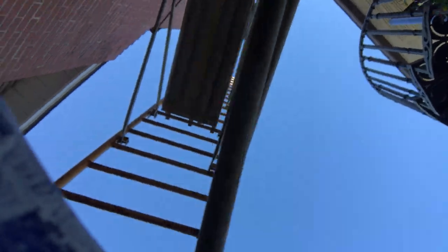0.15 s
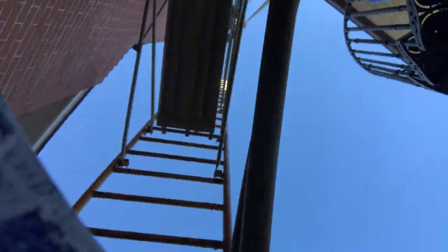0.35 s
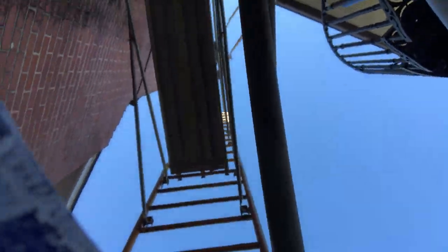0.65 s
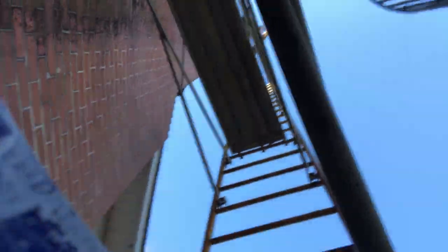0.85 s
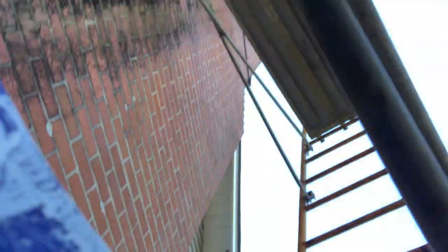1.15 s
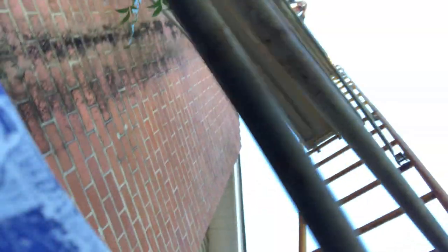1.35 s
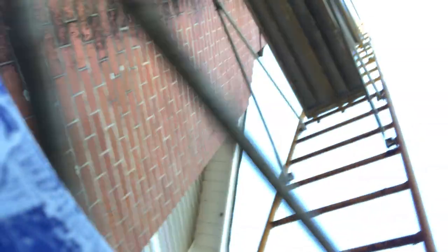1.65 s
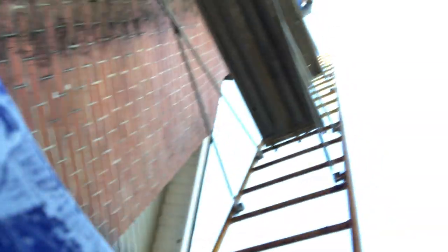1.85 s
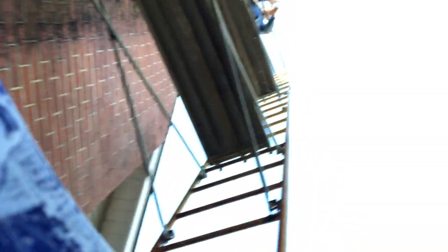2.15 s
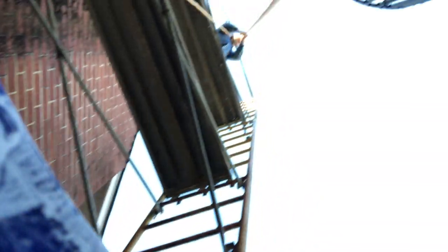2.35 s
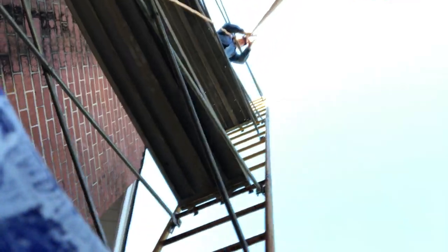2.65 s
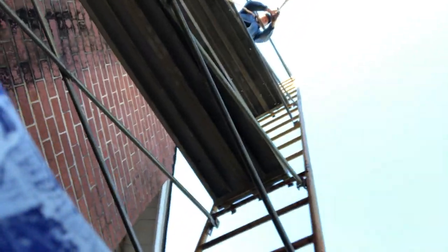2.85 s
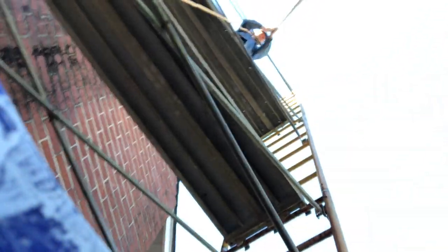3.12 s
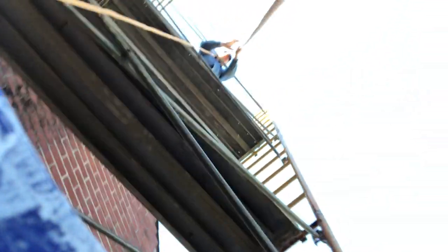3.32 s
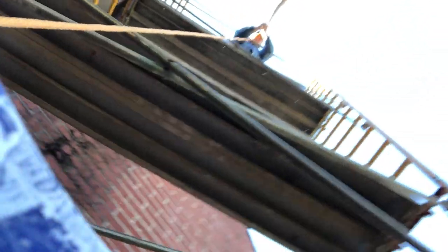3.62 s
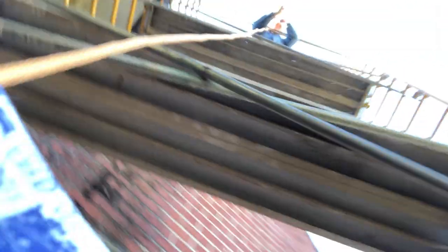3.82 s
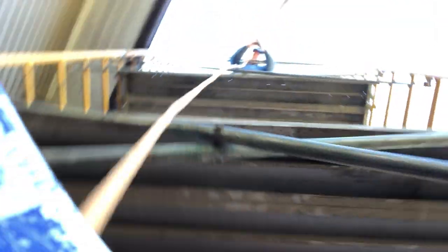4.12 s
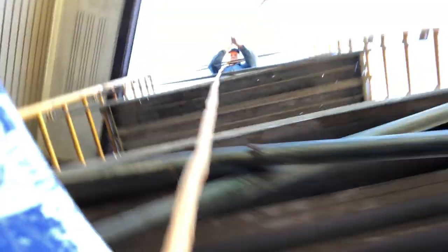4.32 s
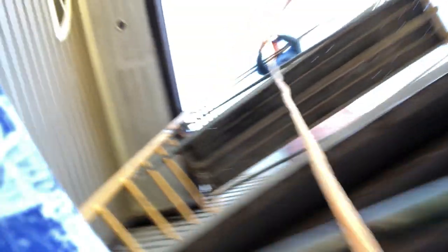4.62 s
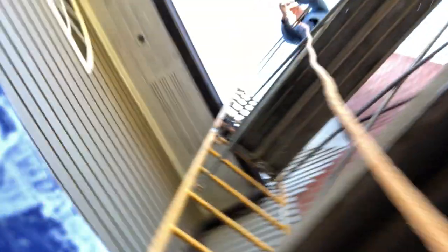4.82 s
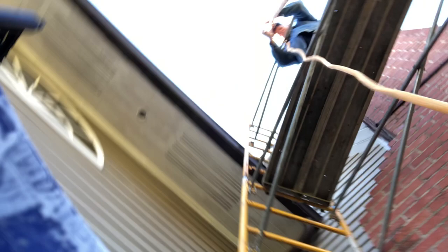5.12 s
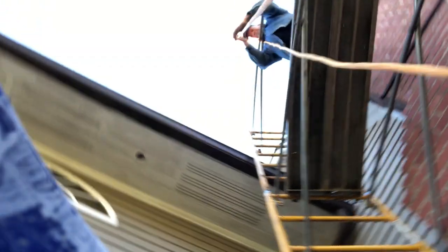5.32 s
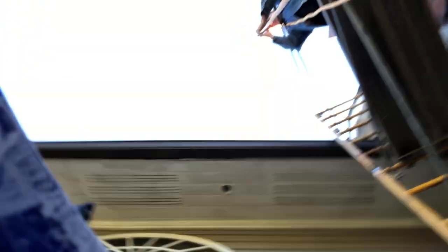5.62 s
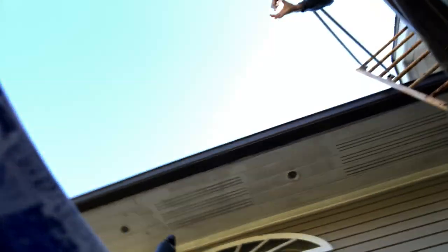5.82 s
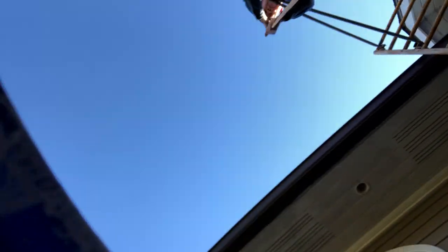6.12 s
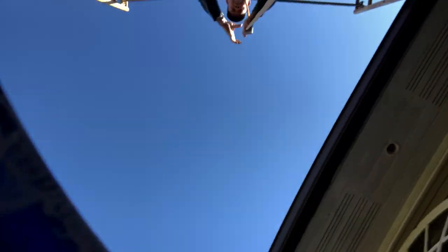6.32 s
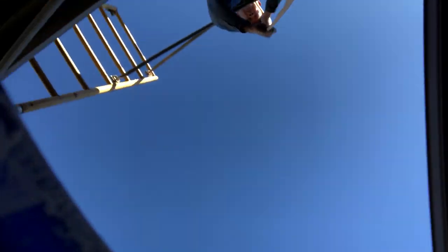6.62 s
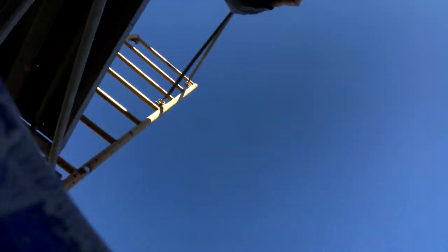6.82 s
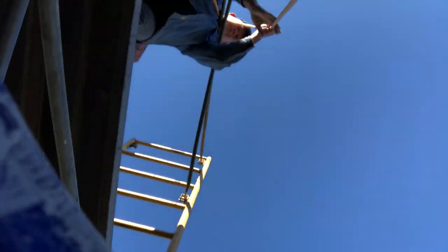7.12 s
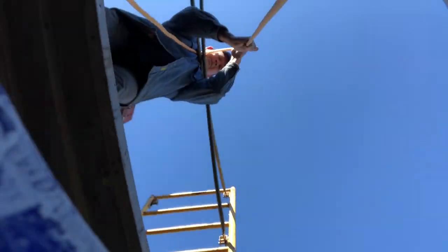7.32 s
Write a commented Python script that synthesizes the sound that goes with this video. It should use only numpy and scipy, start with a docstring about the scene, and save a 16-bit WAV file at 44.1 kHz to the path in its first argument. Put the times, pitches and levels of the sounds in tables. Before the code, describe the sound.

A plastic bucket of tools rises beside a scaffold, the microphone among the load. Short dull-metallic clacks and gritty scuffs run throughout, with a busy clatter at one second, one heavy hollow bump soon after, light ticks, then denser knocking past the middle. Soft wind thuds and a distant outdoor hum lie beneath; late on, a tool slides with a small throbbing squeak before last clacks.

```python
"""A plastic bucket of hand tools is hauled up a scaffold on a rope, the microphone inside it.
A town murmur, a faint hum and low wind buffeting run throughout, made of shaped noise and a sine.
Friction noise scuffs and ringing tools clack all along; early on a bird chirps twice in falling sines.
From 0.3 s the bucket bumps the frame with struck resonances, from 0.9 s dying noise adds bright slaps.
Near the end one tool slides with a throbbing whistle of noise through resonances."""
import sys
import numpy as np
from scipy import signal
from scipy.fft import rfft, irfft, next_fast_len
from scipy.io import wavfile

SR = 44100
rng = np.random.default_rng(int(sys.argv[2]) if len(sys.argv) > 2 else 0)


def to_wav(s):
    """Save 16-bit WAV."""
    ch = np.atleast_2d(s).T  # columns
    pcm = np.round(np.clip(ch, -1, 1) * 32767)  # PCM
    wavfile.write(sys.argv[1], SR, pcm.astype(np.int16))


N = 328986

# resonances of the tools, the last six broad and dry: pitch_hz, level_db, t60_s (time to fall by 60 dB)
TOOL_MODES = [(541.7, -0.5, 0.13), (592, 4, 0.056), (976, 5.5, 0.048), (1178.4, 3.5, 0.073),
              (1269, -1, 0.072), (1672.5, 1.5, 0.039), (2036, -1.5, 0.007), (2189.6, 9.5, 0.01),
              (2292, -19, 0.084), (2913, -6, 0.044), (3350, -12.5, 0.037), (3656, 4.5, 0.0078),
              (4680, -11, 0.019), (7400, -10.5, 0.026), (781, 4, 0.015), (1801, 1.5, 0.023),
              (3250, -2, 0.0062), (5810, 7.5, 0.00088), (8620, 11.5, 0.00074), (12900, 0, 0.0028)]
# level of the steady rubbing of the load: time_s, level_db
RUBBING = [(0, -67), (.6, -67), (1.0, -59.5), (1.45, -66), (1.9, -62), (2.4, -56.5), (2.8, -69),
           (3.3, -52.5), (3.9, -64), (4.5, -58), (5.2, -56.5), (5.7, -64.5), (6.4, -59), (6.9, -59),
           (7.46, -59)]
# single scuffs: middle_s, half_length_s, rub_db, swish_db, sizzle_db
STROKES = [(.285, 0.042, -58.5, -69, -68), (.55, 0.0091, -84, -68, -80), (.89, 0.038, -57, -61.5, -82),
           (1.052, 0.014, -37.5, -40, -80), (1.14, 0.057, -56, -62, -80), (1.22, 0.026, -40, -47, -69),
           (1.29, 0.054, -46, -60, -80), (1.7, 0.057, -46.5, -88, -84), (1.87, 0.062, -54.5, -74, -92),
           (2.045, 0.045, -63, -61.5, -57), (2.23, 0.016, -69.5, -65, -80), (2.47, 0.022, -65, -64.5, -62),
           (3.35, 0.027, -55, -71, -75), (3.52, 0.072, -56, -69, -82), (4.07, .02, -90, -90, -63),
           (4.42, 0.023, -42.5, -64, -80), (6.27, 0.024, -55.5, -79, -85), (6.78, 0.017, -47, -60, -72),
           (6.87, 0.045, -49.5, -85, -85), (7.02, 0.016, -58, -64, -90)]


def amp(db):
    """Gain of a dB value."""
    return 10 ** (np.asarray(db) / 20)


def rms_one(x):
    """Scale to rms 1."""
    return x / np.sqrt(np.mean(x ** 2) + 1e-20)


def in_time(rows):
    """Columns of a curve table, joined by straight lines, at every sample."""
    s, *columns = np.transpose(rows)
    return [np.interp(np.arange(N) / SR, s, c) for c in columns]


def drift(rate_hz):
    """Random wandering of rms 1: noise smoothed to keep what is slower than about rate_hz."""
    step = 40   # computed only at every 40th sample, then joined by lines
    r = np.exp(-2 * np.pi * rate_hz * step / SR)
    noise = rng.standard_normal(N // step + 2002)
    slow = signal.lfilter([1], [1, -2 * r, r * r], noise)[2000:]   # skip the filter's start
    return np.interp(np.arange(N) / step, np.arange(len(slow)), rms_one(slow))


def colour(x, spectrum):
    """Shape a signal to a spectrum in dB per Hz, power kept for white input."""
    hz, level_db = np.transpose(spectrum)
    size = next_fast_len(N)
    bins_hz = np.maximum(np.arange(size // 2 + 1) * SR / size, 1)
    gain = amp(np.interp(np.log(bins_hz), np.log(hz), level_db, left=-90, right=-90))
    return irfft(rfft(x, size) * rms_one(gain), size)[:N]


def swells(rows):
    """Sums of bell-shaped swells, one gain curve for each dB column."""
    out = np.zeros((len(rows[0]) - 2, N))
    for middle_s, half_s, *level_db in rows:
        first = max(round((middle_s - 3 * half_s) * SR), 0)
        last = min(round((middle_s + 3 * half_s) * SR), N)
        near = np.arange(first, last)
        bell = np.exp(-((near / SR - middle_s) / half_s) ** 2)
        out[:, near] += amp(level_db)[:, None] * bell
    return out


def ring(x, hz, t60_s):
    """A resonance: a unit click sets a dying sine of starting height 1 ringing."""
    r, w = amp(-60 / (t60_s * SR)), 2 * np.pi * hz / SR
    return signal.lfilter([0, np.sin(w)], [1, -2 * r * np.cos(w), r * r], x + 1e-18)


def struck(blows, modes, tilt_hz, spread_db, sparse, swell_cycles):
    """Each blow is a short dying chatter of contacts; it drives every mode with a strength of its own.

    A blow lists its start in s, a level in dB at each tilt_hz, and the fading time of its chatter in s."""
    size = 2048   # samples of chatter
    t = np.arange(size) / SR
    hz = np.array(modes)[:, 0]
    drive = np.zeros((len(modes), N + size))
    softer = np.exp(-np.outer(hz, t) / 60.0)   # later contacts are softer and lose the treble
    luck = rng.standard_normal((len(blows), len(modes) + 2 * size))
    for (start_s, *tilt_db, length_s), row in zip(blows, luck):
        mode_luck, size_luck, push = np.split(row, [len(modes), len(modes) + size])
        contacts = push * amp(sparse * size_luck)
        contacts[0] = np.max(np.abs(contacts[:60]))   # the first touch is firm
        contacts *= np.exp(-t / np.clip(length_s, .0003, .015))
        contacts /= np.sqrt(np.sum(contacts ** 2))
        # what the chatter holds at each mode
        reach = np.abs(rfft(contacts))[np.round(hz * size / SR).astype(int)]
        mode_db = np.interp(np.log(hz), np.log(tilt_hz), tilt_db)
        strength = amp(mode_db + spread_db * mode_luck)
        strength /= np.sqrt(reach ** 2 + 0.092)   # evens out the share each mode gets of the blow
        at = round(start_s * SR)
        drive[:, at:at + size] += strength[:, None] * contacts * softer
    out = np.zeros(N)
    for d, (f, db, t60_s) in zip(drive, modes):
        # a mode takes some cycles to swell, so the lows come late: a wide resonance of gain 1 goes first
        unit_gain = 2 * np.log(1000) * f / (swell_cycles * SR)
        swell = unit_gain * ring(d[:N], f, swell_cycles / f)
        out += amp(db) * ring(swell, f, t60_s)
    return out


def town():
    """A far murmur of shaped steady noise, and a hum: a sine wavering in pitch and level."""
    # spectrum of the murmur: pitch_hz, level_db (per Hz, relative)
    murmur_spectrum = [(15, -63), (25, 5.5), (76, 13.5), (149, -9.5), (301, -6.5), (531, -7), (1070, -5.5),
                       (1190, -9.5), (1520, -16), (2220, -15), (2610, -19), (14800, -28.5), (16000, -28)]
    # level of the hum: time_s, level_db
    hum_level = [(0, -61.5), (3, -62.5), (4, -65.5), (7.46, -62)]
    murmur = amp(-59.5) * colour(rng.standard_normal(N), murmur_spectrum)
    hum_hz = 149 + 1.35 * drift(4.2)
    phase = 2 * np.pi * np.cumsum(hum_hz) / SR
    hum = amp(in_time(hum_level)[0] + 0.62 * drift(4)) * np.sin(phase)
    return murmur + hum


def wind():
    """Low buffeting at the microphone: deep noise with a wandering level, swelling in gusts."""
    # steady level: time_s, level_db
    wind_level = [(0, -59), (.8, -59.5), (1.4, -67.5), (2.2, -61.5), (3.0, -56), (3.7, -55.5), (4.4, -57),
                  (5.1, -57), (5.6, -57.5), (6.1, -48), (6.7, -58.5), (7.46, -53)]
    # spectrum: pitch_hz, level_db (per Hz, relative)
    buffet_spectrum = [(12, -39), (20, -50), (53, 6.5), (92, 6.5), (170, -3), (343, -15), (398, -17.5),
                       (449, -61), (500, -38), (650, -62), (1100, -120)]
    # added swells: middle_s, half_length_s, level_db
    gusts = [(1.125, 0.011, -34), (1.22, 0.036, -34.5), (3.26, 0.055, -45), (4.42, 0.096, -44.5),
             (4.755, 0.011, -30.5), (4.86, 0.05, -46.5), (5.01, 0.032, -37.5), (5.76, 0.0077, -31),
             (5.865, 0.01, -43.5), (5.98, 0.038, -44), (6.08, 0.035, -41), (6.36, 0.014, -47.5),
             (6.46, 0.045, -43.5), (6.85, 0.062, -43), (7.05, 0.078, -55), (7.33, 0.031, -50.5)]
    gain = amp(in_time(wind_level)[0] + 0.49 * drift(9.0)) + swells(gusts)[0]
    return gain * colour(rng.standard_normal(N), buffet_spectrum)


def scuff():
    """Uneven grains of friction: part rings the tools, part is a broad rub and a bright swish."""
    # spectra of the two: pitch_hz, level_db (per Hz, relative)
    rub_spectrum = [(88, -68), (150, -7), (192, 1), (444, -2.5), (596, -2.5), (885, -4), (1220, -5),
                    (5000, -30), (6500, -119), (11000, -120)]
    swish_spectrum = [(1760, -9.5), (3000, 3), (4230, 1), (4570, 2), (9870, -4), (12500, -5), (16000, -7.5)]
    steady_db = in_time(RUBBING)[0]
    rub_stroke, swish_stroke = swells(STROKES)[:2]
    rub_gain = amp(steady_db) + rub_stroke
    swish_gain = amp(steady_db - 17) + swish_stroke
    rub_grains = rng.standard_normal(N) * amp(2.2 * drift(80))
    swish_grains = rng.standard_normal(N) * amp(2.5 * drift(150))
    rings = rms_one(sum(amp(db) * ring(rub_grains, hz, t60_s) for hz, db, t60_s in TOOL_MODES[:10]))
    rub = rms_one(colour(rub_grains, rub_spectrum)) + 0.12 * rings
    swish = rms_one(colour(swish_grains, swish_spectrum))
    return rub_gain * rub + swish_gain * swish


def ticks():
    """Faint touches at random moments, more where the rubbing is loud, as rows like the clacks."""
    count, middle_db, spread_db, treble_db = 30, -51, 3, -13
    busy = np.cumsum(amp(in_time(RUBBING)[0]))
    when, size = rng.random((count, 2)).T
    starts_s = np.interp(when, busy / busy[-1], np.arange(N) / SR)
    return [(s, middle_db + spread_db * (2 * z - 1), treble_db) for s, z in zip(starts_s, size)]


def tools():
    """Clacks and ticks ring the tools; hard blows ring brighter and chatter longer, each with its own treble."""
    # the louder clacks: start_s, level_db (relative strength of the blow), treble_db (beside that level)
    clacks = [(0.0221, -48.5, -8), (.171, -50, -21), (0.222, -33, -8.5), (0.2496, -40.5, -2),
              (0.6895, -46.5, 0), (.7084, -45, -18), (0.722, -36, -9), (0.7438, -35.5, -4.5),
              (0.844, -39.5, -25), (0.8822, -40, -12), (0.9114, -28, -15), (1.0293, -37, -6),
              (1.036, -31, -5), (1.047, -39, -17), (1.063, -29.5, -29), (1.0945, -37, 5),
              (1.1132, -51, -21), (1.1655, -34, -3), (1.196, -36, 2), (1.2226, -37.5, -4), (1.2689, -37, 3),
              (1.369, -38, -12), (1.6533, -15, -7), (1.7826, -42, -7), (1.843, -42, -16), (1.8784, -46, -6),
              (1.922, -46.5, 6.5), (2.0863, -49, -24), (2.2343, -57, 11), (2.4294, -47, -15),
              (2.5412, -33.5, -6.5), (2.5957, -34.5, -16), (2.6327, -39.5, -33), (2.8339, -44, -40),
              (2.8963, -48, -18), (2.9338, -40.5, -18), (2.9592, -46.5, -30), (3.0808, -36.5, -23),
              (3.1317, -17.5, -13.5), (3.1951, -45, -12), (3.3353, -44, -18), (3.366, -32, -12),
              (3.3948, -38.5, -19), (3.4333, -34.5, -20), (3.588, -44, -13), (3.618, -44, -24),
              (3.6695, -37, -17), (3.675, -30, -17), (3.7581, -43, -31), (3.8485, -36.5, -11),
              (3.8859, -33, -20), (3.9726, -40.5, -10), (4.0349, -41, -12), (4.0861, -35.5, -3.5),
              (4.127, -36.5, -22), (4.18, -39, -28), (4.25, -46, -13), (4.2776, -37, -17),
              (4.336, -43, -20), (4.36, -21, -11.5), (4.3976, -26.5, -12.5), (4.411, -30, -22),
              (4.4237, -40, -18), (4.4607, -44, -22), (4.4854, -46, -20), (4.498, -30.5, -10.5),
              (4.5182, -24, -15), (4.6263, -35.5, -38), (4.6488, -27, -8.5), (4.695, -22, -5.5),
              (4.7703, -30.5, -5), (4.8044, -23.5, -9.5), (4.8368, -21, -18), (4.8512, -34, -36),
              (4.8984, -32.5, -13), (4.936, -30.5, -12.5), (4.9598, -37.5, -36), (5.0186, -29.5, -13),
              (5.0543, -29.5, -20), (5.082, -27, -13), (5.1358, -28, -24), (5.1781, -37.5, -11),
              (5.241, -29.5, -10), (5.3157, -30.5, 21.5), (5.4096, -31, -4), (5.5265, -41.5, -16),
              (5.5587, -43, -6), (5.5661, -31.5, -68), (5.7216, -42.5, -24), (5.7464, -45, -30),
              (5.9662, -39, -19.5), (6.0357, -37, -22), (6.123, -63, 9), (6.134, -56.5, 8),
              (6.164, -42.5, -37), (6.1709, -24.5, -14.5), (6.248, -46, -3), (6.2867, -33, -39),
              (6.3108, -29, -10), (6.4946, -33.5, -35), (6.6223, -42, -18), (6.6651, -53, -20),
              (6.721, -34, -13), (6.76, -19, -59), (6.7768, -39, -23), (6.8215, -32, -23),
              (6.8345, -27, -12), (6.854, -44, -20), (6.8727, -36, -21), (6.8874, -41, -4),
              (6.9687, -38, -51), (7.003, -35.5, -15), (7.175, -35, -3.5), (7.2465, -29, -70),
              (7.2939, -30.5, -33), (7.3166, -26.5, -11.5), (7.3264, -26.5, -56), (7.4432, -41, -38)]
    blows = []
    for start_s, db, treble_db in clacks + ticks():
        harder_db = db + 35   # beside a clack of -35 dB
        low_db = db - 4 - 0.26 * harder_db   # the low ring grows less than the blow
        chatter_s = 0.0051 * amp(0.28 * harder_db)
        blows.append((start_s, low_db, db, db + treble_db, chatter_s))
    return amp(-10) * struck(blows, TOOL_MODES, tilt_hz=[800, 2100, 6000], spread_db=3.0,
                             sparse=5.37, swell_cycles=7.66)


def bird():
    """Two falling whistles: sines gliding down, blurred by many far echoes made of dying noise."""
    # start_s, length_s, from_hz, to_hz, level_db (of the whistle before its echoes)
    chirps = [(0.033, 0.08, 4740, 2400, -68.5), (0.36, 0.085, 4340, 2500, -68.5)]
    out = np.zeros(N)
    for start_s, length_s, from_hz, to_hz, db in chirps:
        share = np.linspace(0, 1, round(length_s * SR))
        pitch_hz = to_hz + (from_hz - to_hz) * (1 - share) ** 1.4   # the fall flattens towards its end
        whistle = np.sin(np.pi * share) * np.sin(2 * np.pi * np.cumsum(pitch_hz) / SR)
        out[round(start_s * SR):][:len(share)] = amp(db) * whistle
    t = np.arange(SR // 4) / SR
    echoes = rng.standard_normal(len(t)) * amp(-60 * t / 0.37)   # falls at 60 dB in 0.37 s
    return out + amp(-25.5) * signal.fftconvolve(out, echoes)[:N]


def bucket():
    """Bumps: boom of the air inside, the base, two knocks of the wall, the ring of the struck frame."""
    # start_s, level_db (relative strength), then beside that level: boom_db, base_db, upper_knock_db,
    # frame_db; last contact_s (fading time of the chatter)
    bumps = [(0.321, -42.5, -18, -10, -25, -26, 0.0034), (0.841, -17.5, -12, -28, -8.5, -24.5, 0.001),
             (0.853, -26.5, -6.5, -13, -4, -25, 0.0021), (1.037, -21.5, -17.5, -23, -10, -17, 0.0063),
             (1.646, -45, -6, -12, 17, 6, 0.0063), (1.656, -20.5, 5.5, 5, 13, 6, 0.0015),
             (1.67, -30.5, 4.5, 11, 5.5, 14.5, 0.0077), (1.925, -50, -21, -13, -18, 4.5, 0.0047),
             (2.187, -46.5, -10, 3, 1, 10, 0.0027), (3.141, -37.5, -13, -4, 2, -15.5, 0.0072),
             (4.408, -28, -15, -6, -11.5, -18, 0.0042), (6.29, -32.5, -22.5, -17, -5.5, -8, 0.0036),
             (6.305, -32.5, -16, -7.5, -11, -19, 0.006), (6.779, -42, -10, -6, 1, 6, 0.0053),
             (6.837, -40.5, -15, -13, -1, 10, 0.0035)]
    # resonances of the bucket and, from 1 kHz up, of the steel frame: pitch_hz, level_db, t60_s
    bucket_modes = [(64, -33, 0.17), (137.8, 3, 0.086), (196, -7.5, 0.013), (336, -3, 0.051),
                    (653, 0, 0.037), (900, 6, 0.012), (1108, -5.5, 0.066), (95, 1, .13), (247, -2, .13),
                    (442, 4, .042), (719, 4, .036), (1131, -2, .13), (2885, -22, .09), (3785, -20, .045),
                    (4885, -25, .07), (5045, -21, .04), (8200, -54, 0.081)]
    blows = []
    for start_s, db, boom_db, base_db, knock_db, frame_db, contact_s in bumps:
        # blows above -20 dB brighten the top of the frame, softer ones dull it
        frame_top_db = frame_db + 0.54 * (db + 20)
        blows.append((start_s, db + boom_db, db + base_db, db, db + knock_db,
                      db + frame_db, db + frame_top_db, contact_s))
    return struck(blows, bucket_modes, tilt_hz=[140, 243, 413, 692, 1100, 2500], spread_db=1.5,
                  sparse=2.06, swell_cycles=6.2)


def slaps():
    """Noise that starts at once and dies away, with a sizzle on top that the scuffs share."""
    # start_s, level_db (relative), t60_s
    slap_rows = [(0.9135, -38, 0.033), (1.039, -31.5, 0.051), (1.049, -25.5, 0.045), (1.1119, -27, 0.034),
                 (1.6514, -37, 0.15), (3.1267, -50, 0.023), (5.3134, -31.5, 0.21), (5.412, -45.5, 0.0098),
                 (6.759, -48, 0.054)]
    # spectrum of the body: pitch_hz, level_db (per Hz, relative)
    slap_spectrum = [(290, -18), (500, -22), (919, -10.5), (1380, -27), (1720, -10), (2130, -20),
                     (4400, -26.5), (5090, -27.5), (16000, -50.5)]
    t = np.arange(N) / SR
    body_gain, sizzle_gain = np.zeros(N), swells(STROKES)[2]
    for start_s, db, t60_s in slap_rows:
        dying = (t >= start_s) * amp(db - 60 * np.abs(t - start_s) / np.clip(t60_s, .01, .4))
        body_gain = body_gain + dying
        sizzle_gain = sizzle_gain + amp(-9.5) * dying
    treble_only = signal.butter(2, 10500, "high", fs=SR, output="sos")
    sizzle = signal.sosfilt(treble_only, rng.standard_normal(N))
    body = amp(-0.5) * colour(rng.standard_normal(N), slap_spectrum)
    return body_gain * body + sizzle_gain * sizzle


def slide():
    """A tool slides: throbbing friction noise whistles through a few resonances."""
    # level, silent outside these times: time_s, level_db (before the throb, for a resonance of 0 dB)
    slide_level = [(6.3, -71), (6.335, -61), (6.42, -67), (6.5, -68.5), (6.62, -78)]
    # resonances: pitch_hz, width_hz (about), level_db
    slide_rings = [(2200, 140, 4), (2550, 200, 0), (3950, 200, -12), (6800, 450, -12), (9200, 600, -5)]
    t = np.arange(N) / SR
    throb = 1 + .4 * np.sin(2 * np.pi * 47.5 * t)   # 47.5 throbs a second
    noise = rng.standard_normal(N)
    rings = sum(amp(db) * rms_one(ring(noise, hz, 2.0 / width_hz)) for hz, width_hz, db in slide_rings)
    sliding = (t > slide_level[0][0]) * (t < slide_level[-1][0])
    return sliding * amp(in_time(slide_level)[0]) * throb * rings


def scene():
    """All sources at one microphone."""
    return (town() + wind() + scuff() + tools() + bird() + bucket() + slaps() + slide())[None]


def record(dry):
    """The deepest bass (below 48 Hz) and the top (above 16500 Hz) are cut by filters."""
    bass_cut = signal.sosfilt(signal.butter(4, 48, "high", fs=SR, output="sos"), dry)
    return signal.sosfilt(signal.cheby2(12, 50, 16500, fs=SR, output="sos"), bass_cut)


dry = scene()
out = record(dry)
to_wav(out)
```